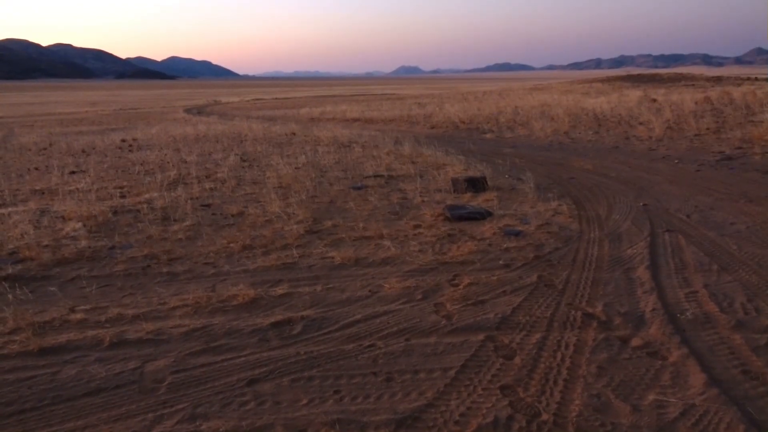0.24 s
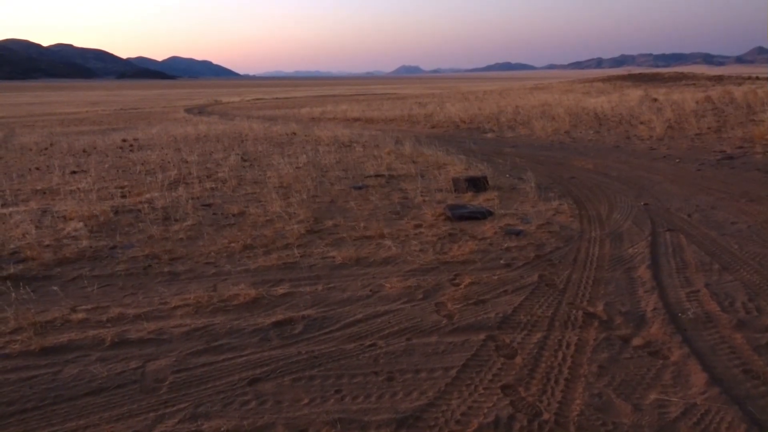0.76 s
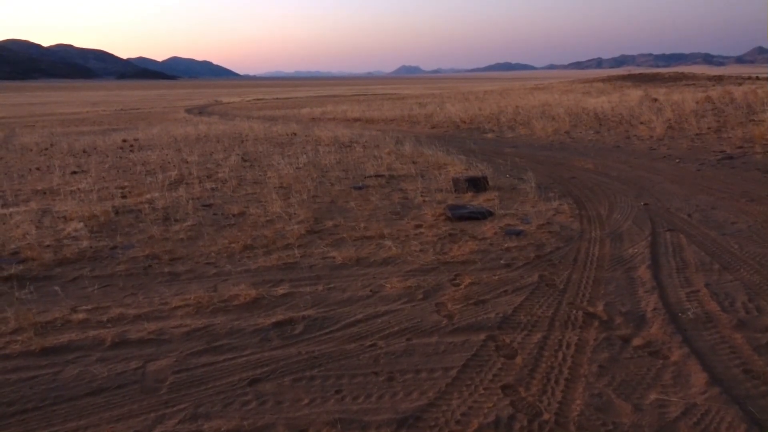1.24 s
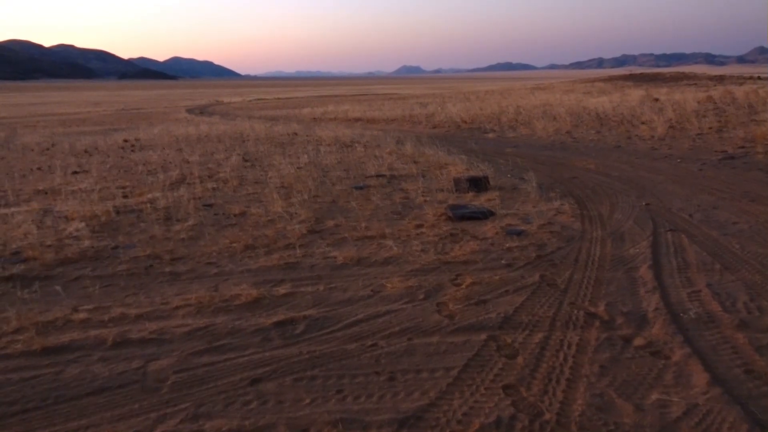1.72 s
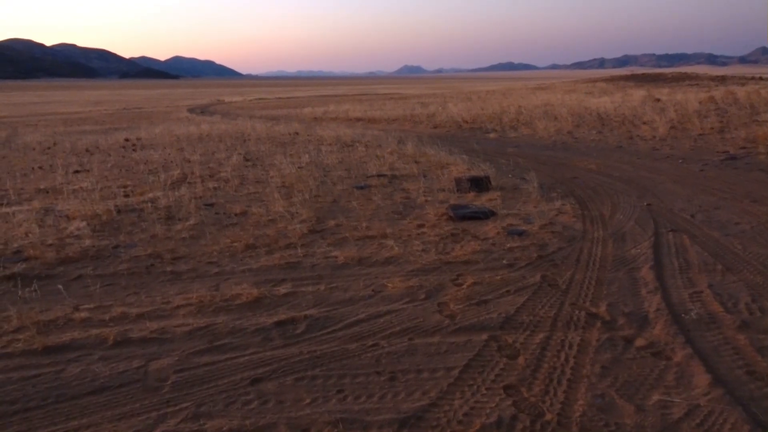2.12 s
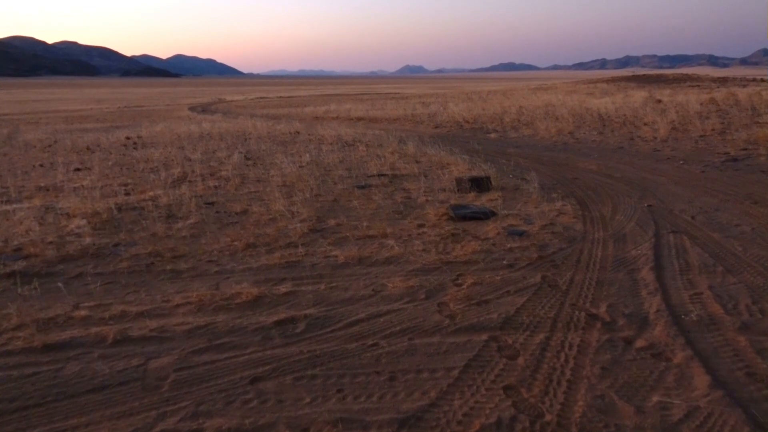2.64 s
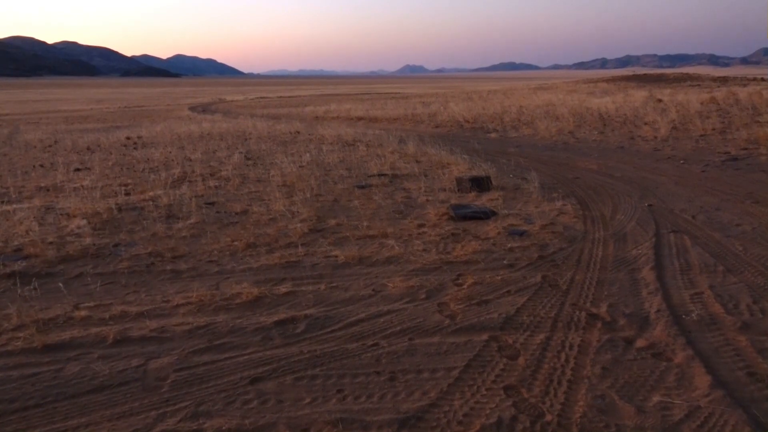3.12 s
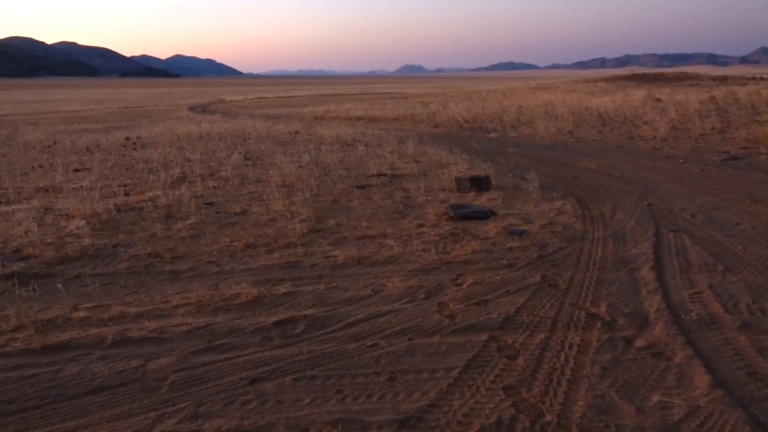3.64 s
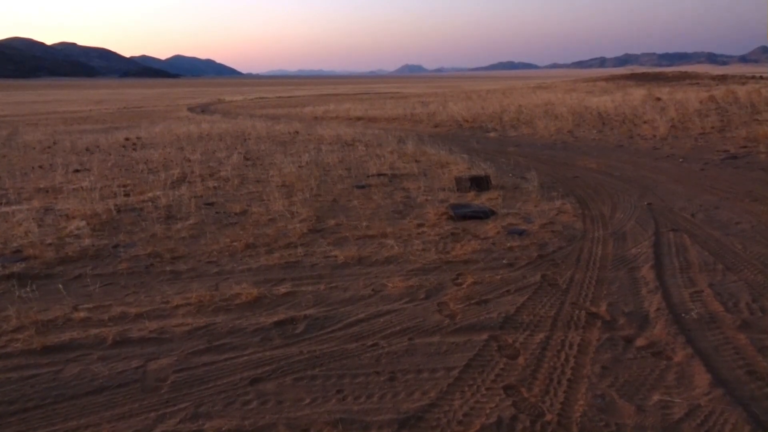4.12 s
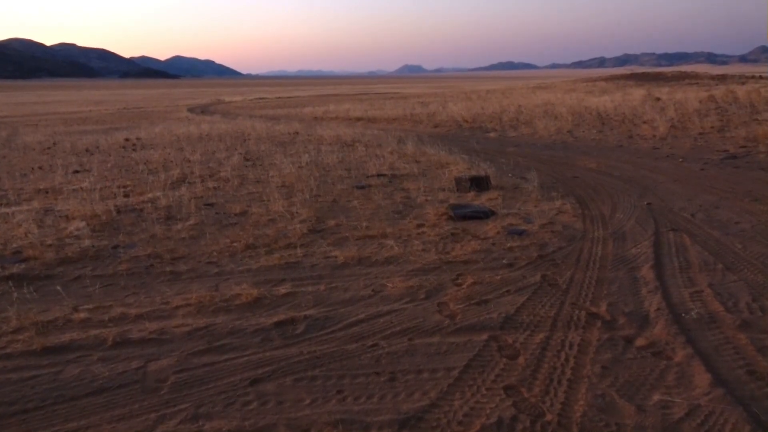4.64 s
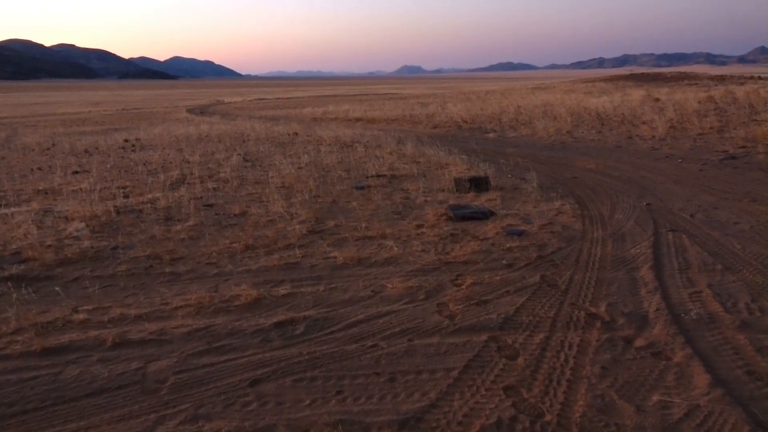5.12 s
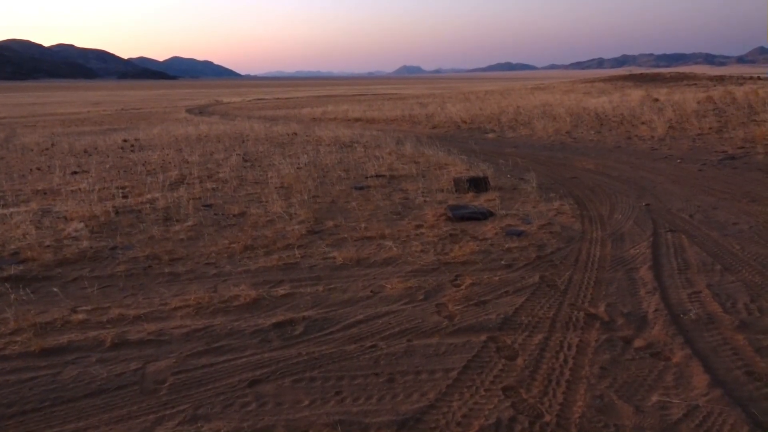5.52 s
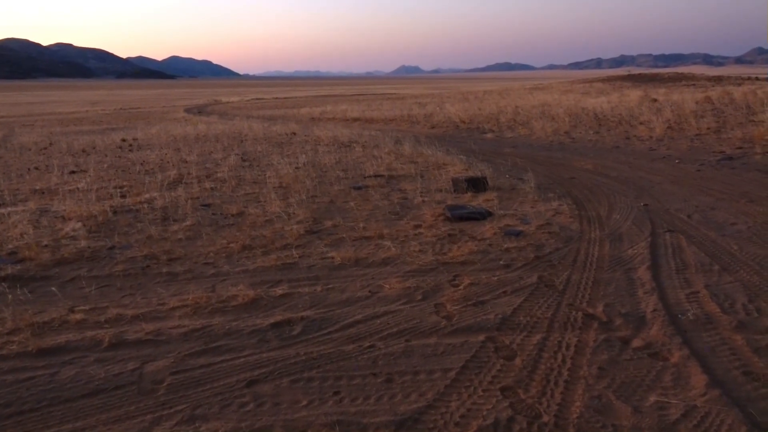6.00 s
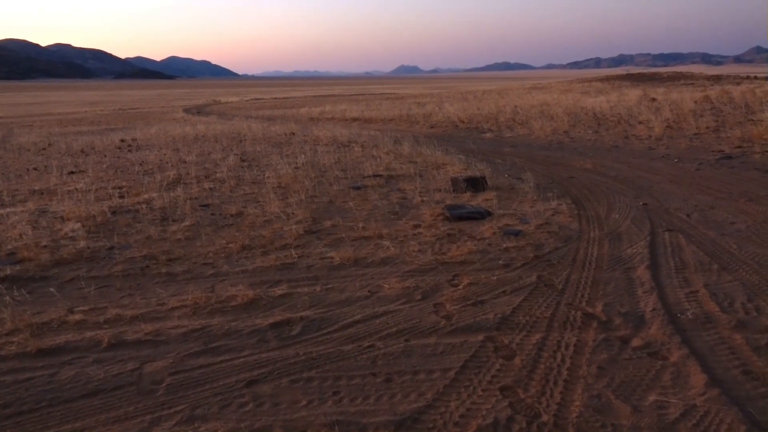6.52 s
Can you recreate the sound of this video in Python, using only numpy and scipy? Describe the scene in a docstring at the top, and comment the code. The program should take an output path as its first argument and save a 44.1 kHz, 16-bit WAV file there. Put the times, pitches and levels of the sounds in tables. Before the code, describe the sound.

Geckos call across open desert ground in runs of short, raspy barks made of rapid clicks. Faint overlapping callers on the left come first, then one close gecko nearly straight ahead gives six loud, sharp barks. After a brief lull, several neighbours on the left call over each other and fade. Light wind thumps and rumbles on the microphone, mostly from the middle onward, above a thin steady hiss.

```python
"""Open desert ground at dusk, where barking geckos call from their burrows.
One is close by; off to the left are several neighbours and, far beyond them, many more.
Each bark is a short train of clicks that rings the throat, sags in pitch and slows to a stop;
the ground scatters it faintly. Light wind buffets the microphone over a thin hiss."""
import sys
import numpy as np
from scipy import signal
from scipy.fft import rfft, irfft, next_fast_len
from scipy.io import wavfile
from scipy.ndimage import uniform_filter1d

SR = 44100
rng = np.random.default_rng(int(sys.argv[2]) if len(sys.argv) > 2 else 0)


def to_wav(sig):
    """Store sig (one row per channel, or 1-D mono) as 16-bit WAV at the path in sys.argv[1].

    Samples outside -1..1 are clipped; the rate is SR.
    """
    pcm = np.clip(np.atleast_2d(sig), -1, 1) * 32767
    pcm = np.round(pcm).astype(np.int16)
    wavfile.write(sys.argv[1], SR, pcm.T)  # frames by channels


N = 298557


def undb(db):
    """Turn decibels into a number to multiply by."""
    return 10 ** (np.asarray(db) / 20)


def level(x, db):
    """Scale a sound to an average (rms) level."""
    return x * undb(db) / np.sqrt(np.mean(x ** 2))


def along(points, size):
    """Join (f/Hz, value) points into a curve across a spectrum."""
    hz, value = np.transpose(points)
    bin_hz = np.arange(size // 2 + 1) * SR / size
    return np.interp(np.log(bin_hz + 1), np.log(hz), value)


def response(points, size=1024):
    """A filter with the given (f/Hz, level/dB) tone colour that never rings ahead of the sound."""
    cepstrum = irfft(np.log(undb(along(points, size))))
    cepstrum[1:size // 2] *= 2
    cepstrum[size // 2 + 1:] = 0
    return irfft(np.exp(rfft(cepstrum)))[:size // 2]


def dull(x, edge_hz, order=8):
    """Take away the treble above edge_hz without delaying the sound."""
    hz = np.arange(len(x) + 1) * SR / (2 * len(x))
    return irfft(rfft(x, 2 * len(x)) / (1 + (hz / edge_hz) ** order))[:len(x)]


def noise(points, likeness):
    """Stereo noise of a given tone colour; a likeness of 1 makes both ears the same."""
    size = next_fast_len(N, True)
    mid, side = rfft(rng.standard_normal((2, size))) * undb(along(points, size))
    mid, side = mid * np.sqrt(1 + likeness), side * np.sqrt(1 - likeness)
    return level(irfft([mid + side, mid - side], size)[:, :N], 0)


def flutter(rate_hz):
    """A wobble of about 1 either way that slides from one random value to the next."""
    step = int(SR / rate_hz)
    held = np.repeat(rng.standard_normal(N // step + 1), step)
    return level(uniform_filter1d(held, step)[:N], 0)


def add(out, start_s, sound, pan_db=0, lag_s=0):
    """Mix a sound in; the right ear hears it pan_db weaker and lag_s later."""
    for ear, at, gain in ((0, start_s, 1), (1, start_s + lag_s, undb(-pan_db))):
        i = max(int(round(at * SR)), 0)
        part = sound[:max(N - i, 0)]
        out[ear, i:i + len(part)] += gain * part


# tone colour of the background hiss: f/Hz, level/dB
HISS_COLOUR = [(25, -7), (100, -18), (300, -4), (700, 1), (900, 4.5), (1060, 3.5), (1200, 6), (1380, 1.5),
               (1580, 2.5), (2500, -0.5), (4000, 0), (5200, -6), (9000, -8), (16000, -12)]
# how alike the hiss is in the two ears: f/Hz, likeness (0 to 1)
HISS_LIKENESS = [(60, 1), (290, 0.45), (640, 0.038), (1400, 0.061), (3100, 0.13), (6800, 0.41),
                 (15000, 0.46)]


def background_hiss():
    """Steady background hiss, coloured by the camera body's resonances."""
    return noise(HISS_COLOUR, along(HISS_LIKENESS, next_fast_len(N, True))) * undb(-48)


# strength of the wind on the microphone, before eddies and flutter: t/s, level/dB
WIND_STRENGTH = [(0.0, -42.5), (0.17, -63.5), (0.9, -76), (1.21, -69), (1.47, -54), (1.7, -68), (1.96, -61),
                 (2.13, -46), (2.41, -74), (2.58, -50), (2.77, -49), (3.0, -53.5), (3.26, -61),
                 (3.39, -35.5), (3.62, -47.5), (3.92, -48.5), (4.15, -66), (4.28, -55), (4.71, -47.5),
                 (4.86, -42), (4.96, -38), (5.11, -55), (5.49, -60), (5.62, -68), (5.88, -80), (6.11, -74),
                 (6.22, -67.5), (6.77, -51.5)]
# single eddies (swirls of air) and their peaks: t/s, level/dB
EDDY_THUMPS = [(.04, -33), (0.342, -44.5), (1.44, -35), (2.449, -18), (2.531, -30), (2.841, -29.5),
               (3.232, -34.5), (3.364, -25.5), (3.454, -17), (3.741, -21), (4.109, -35), (4.205, -33),
               (4.305, -33), (4.44, -33), (4.662, -25), (4.753, -23), (4.805, -19), (4.952, -18),
               (5.01, -19), (5.082, -29.5), (5.112, -24), (5.231, -38), (5.367, -38.5), (6.088, -20.5),
               (6.211, -29.5), (6.282, -30), (6.345, -23), (6.74, -38.5)]
# tone colour of the wind's rumble: f/Hz, level/dB
WIND_COLOUR = [(20, -30), (45, -5.5), (80, 1), (120, 3), (190, -8), (270, -13.5), (400, -21.5), (700, -43),
               (2000, -100)]


def wind(eddy_hz=167.6, wake_db=-12, wake_s=0.021, flutter_db=3.5):
    """Churning air rumbles; eddies thump the two microphones a moment apart and stir up more rumble."""
    now = np.arange(N) / SR
    strength = undb(np.interp(now, *np.transpose(WIND_STRENGTH)))
    thumps, t = np.zeros((2, N)), np.arange(-SR // 50, SR // 50) / SR
    for peak_s, db in EDDY_THUMPS:
        phase, pan_db, lag_s, stretch = rng.normal(0, [.8, 1.2, .0007, .1])
        cycles = t * eddy_hz * (1 + stretch)
        swirl = np.exp(-(cycles / .62) ** 2) * np.sin(2 * np.pi * cycles + phase)
        add(thumps, peak_s + t[0], swirl * undb(db), pan_db, lag_s)
        wake = undb(db + wake_db) * np.exp(-np.abs(now - peak_s) / wake_s)
        strength = np.hypot(strength, wake)
    return thumps + noise(WIND_COLOUR, likeness=0.86) * strength * undb(flutter_db * flutter(40))


# tone colour of what the ground throws back: f/Hz, level/dB
GROUND_COLOUR = [(900, -1.5), (2200, -4.5), (3300, -8.5), (4350, -15), (5500, -4), (9000, -30)]


def ground(x, echo_db, tail_db, echo_s, die_away_s):
    """Grass and ruts scatter a thin, dull tail; a low bank sends back one faint echo."""
    t = np.arange(SR // 2) / SR
    grains = rng.standard_normal((2, len(t))) * (rng.random(len(t)) < .12) * (t > .003)
    tail = grains * undb(-60 * t / die_away_s)
    paths = undb(tail_db) * tail / np.linalg.norm(tail[0])
    paths[:, int(echo_s * SR)] += undb(echo_db)
    paths = signal.fftconvolve(paths, response(GROUND_COLOUR)[None], axes=1)
    return signal.fftconvolve(x[None, 0], paths, axes=1)[:, :N]


def through_grass(sound, rasp_db, spread_s=0.0078, size=900):
    """Stalks along the way add many later, duller copies, which makes a bark raspy and fuller."""
    stalks = rng.standard_normal(size) * np.exp(-np.arange(size) / SR / spread_s)
    copies = signal.fftconvolve(sound, stalks / np.linalg.norm(stalks))
    return np.pad(sound, (0, size - 1)) + undb(rasp_db) * dull(copies, edge_hz=3290, order=4)


# tone colour of the burrow's mouth: f/Hz, level/dB
BURROW_COLOUR = [(300, -33), (600, -32), (880, -5.5), (1100, -8), (1500, -1), (2200, 5), (2900, 1.5),
                 (3550, 1), (4300, -2), (5100, -5.5), (6200, -5.5), (8000, -14), (15000, -37)]
# tone colour of a long path over sand: f/Hz, level/dB
SAND_COLOUR = [(500, -1), (1500, 1.5), (2500, 1.5), (3800, 2.5), (4800, 2.5), (6500, -5), (12000, -14)]


def burrow(far):
    """The burrow's mouth colours every bark; the way over the sand colours far ones again."""
    mouth = response(BURROW_COLOUR)
    return np.convolve(mouth, response(SAND_COLOUR)) if far else mouth


def bark(colour, rate_hz, length_s, throat_hz, db,
         slow_start, slow_end, damping_hz, sag, fade_db, jitter, uneven_db, size=3000):
    """Clicks gather speed, then slow and fade; each rings the throat lower, shorter and duller."""
    count = max(int(round(length_s * rate_hz)), 2)
    k = np.arange(count)
    chance = rng.standard_normal((40, 3))  # for each click: timing, strength, pitch
    slowing = slow_start / (k + 1) ** 1.3 + slow_end / (count - k) ** 1.3
    gaps_s = (1 + slowing + jitter * chance[:count, 0]) / rate_hz
    click_s = np.append(0, np.cumsum(gaps_s))[:, None]
    progress = click_s / click_s[-1]
    push = undb(-fade_db * progress ** 2 + uneven_db * chance[:count + 1, 1:2])
    ring_hz = throat_hz * (1 - sag * progress ** 2 + 0.031 * chance[:count + 1, 2:])
    t = np.arange(size) / SR
    age = np.maximum(t - click_s, 0)
    decay = np.exp(-np.pi * damping_hz * (1 + progress ** 2) * age)
    rings = push * decay * np.sin(2 * np.pi * ring_hz * age)
    sound = signal.fftconvolve(rings.sum(axis=0), colour)[:size]
    # as the pressure runs out the later clicks lose their top treble and sound softer
    spent = np.minimum(t / click_s[-1], 1)
    sound = sound + spent * (dull(sound, edge_hz=5500) - sound)
    opening = sound[:int(.018 * SR)]  # the strong start sets the level
    return sound * undb(db) / np.sqrt(np.mean(opening ** 2))


def colony(count=100, until_s=5.5):
    """Distant geckos on the left bark at random and merge into a faint chatter."""
    out, colour = np.zeros((2, N)), burrow(far=True)
    voice = dict(slow_start=.06, slow_end=.5, damping_hz=610, sag=.08,
                 fade_db=5, jitter=.025, uneven_db=1.2)
    for when, pace, throat, distance, side in rng.random((count, 5)):
        sound = bark(colour, rate_hz=310 + 170 * pace, length_s=.03,
                     throat_hz=3600 + 600 * throat, db=-53 - 2.5 * distance, **voice)
        add(out, when * until_s, through_grass(sound, rasp_db=11), pan_db=10 * side + 19)
    return out


# one run of barks for each neighbour (a fade below zero swells instead):
# first click rate/Hz, throat f/Hz, base level/dB, fade over the run/dB, bark starts t/s
NEIGHBOUR_RUNS = [(399.4, 3680, -48, 10, [0.119, .325, 0.529, 0.735, 1.063, 1.247, 1.424, 1.595, 1.76, 1.935, 2.1, 2.275]),
                  (401, 4150, -38, 4.5, [.221, .701, 0.909, 1.116, 1.34, 1.689, 2.182]),
                  (558, 4250, -34.5, 1, [.275, .482, .669, .852, 1.024, 1.197, 1.371, 1.547]),
                  (455, 4020, -43.5, 6, [3.605, 3.825, 4.019, 4.215, 4.416]),
                  (463, 4080, -49.5, -8, [3.754, 3.975, 4.175, 4.365]),
                  (530, 4006, -21, 3, [4.291, 4.495, 4.672, 4.836, 4.997, 5.158, 5.315, 5.477, 5.64]),
                  (507, 4120, -25.5, 4, [4.32, 4.544, 4.742, 4.92, 5.099, 5.272, 5.446, 5.634]),
                  (437, 4070, -28.5, 8, [4.657, 5.137, 5.344, 5.543, 5.742, 5.941, 6.15])]


def neighbours(warm_up_db=2, tiring=.12):
    """Geckos on the left call over each other; each warms up, then clicks more slowly as it tires."""
    out, colour = np.zeros((2, N)), burrow(far=True)
    voice = dict(slow_start=.06, slow_end=.5, damping_hz=210, sag=.16,
                 fade_db=9, jitter=.02, uneven_db=1)
    for first_hz, throat_hz, base_db, fade_db, starts in NEIGHBOUR_RUNS:
        for k, start_s in enumerate(starts):
            db = base_db - warm_up_db / (k + 1) - fade_db * (k / (len(starts) - 1)) ** 2
            length_s = .026 * (1.4 if k == 0 else 1)  # the opening bark is longer
            sound = bark(colour, first_hz / (k + 1) ** tiring, length_s, throat_hz, db, **voice)
            rasp_db = -22 - 0.74 * db  # the fainter the caller, the more grass lies in between
            add(out, start_s, through_grass(sound, rasp_db), pan_db=17.5, lag_s=3 / SR)
    return out


# the close gecko's barks, before their clicks slow: t/s, click rate/Hz, length/s, level/dB
CLOSE_BARKS = [(2.3504, 567, 0.039, -10), (2.5627, 498.3, .0285, -8.5), (2.75, 480, 0.026, -9.5),
               (2.9276, 472, 0.029, -9.5), (3.1035, 468.8, 0.0272, -9), (3.2771, 465, .026, -9)]
# tone colour of the hiss on a close click: f/Hz, level/dB
CLICK_HISS_COLOUR = [(1500, -7), (4000, -8), (7000, -3), (10500, -0.5), (15000, -20)]


def close_gecko(throat_hz=4330, sink_hz=38):
    """Six loud barks from nearly straight ahead; each time the throat sinks and the start is slacker."""
    out, colour = np.zeros((2, N)), burrow(far=False)
    voice = dict(damping_hz=190, sag=.12, fade_db=8.5, jitter=.009, uneven_db=.9)
    for k, (start_s, rate_hz, length_s, db) in enumerate(CLOSE_BARKS):
        clicks = rate_hz * length_s  # the more clicks, the further the last ones slow
        sound = bark(colour, rate_hz, length_s, throat_hz - sink_hz * k, db,
                     slow_start=.0498 * k, slow_end=.06 * clicks, **voice)
        hiss = signal.fftconvolve(rng.standard_normal(len(sound)), response(CLICK_HISS_COLOUR))
        power = np.abs(signal.hilbert(sound)) ** 2  # the hardest clicks carry a trace of hiss
        add(out, start_s, sound + level(hiss[:len(sound)], -33.5) * power, pan_db=2.5)
    return out


def scene():
    """Geckos near and far, their scatter off the ground, wind and hiss."""
    close, others = close_gecko(), neighbours()
    scatter = ground(close, echo_db=-16, tail_db=-11, echo_s=0.045, die_away_s=0.65)
    scatter += ground(others, echo_db=-18, tail_db=-8, echo_s=0.062, die_away_s=0.84)
    return background_hiss() + colony() + wind() + scatter + others + close


def record(dry, ceiling=1.0, top_hz=16100):
    """The loudest clicks just overload the recorder, which also cuts the highest treble."""
    treble_cut = signal.ellip(10, .1, 60, top_hz, fs=SR, output="sos")
    return signal.sosfiltfilt(treble_cut, np.clip(dry, -ceiling, ceiling))


dry = scene()
out = record(dry)
to_wav(out)
```